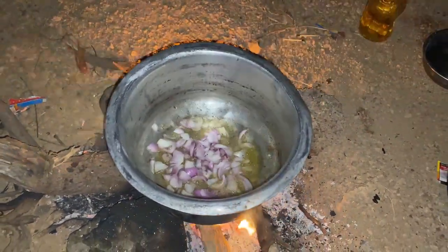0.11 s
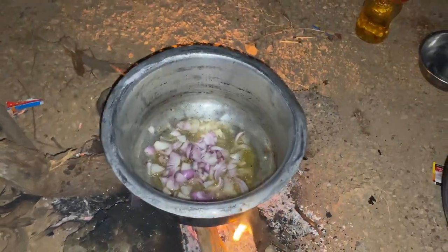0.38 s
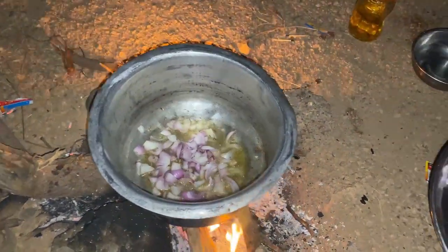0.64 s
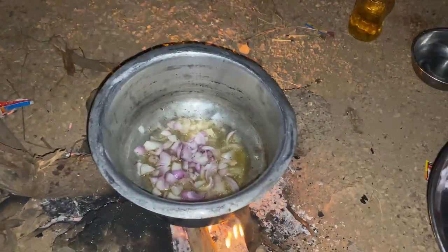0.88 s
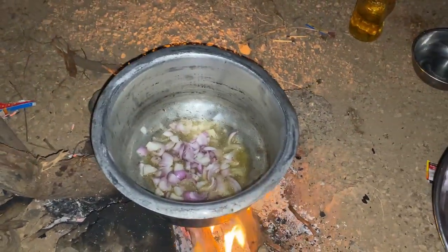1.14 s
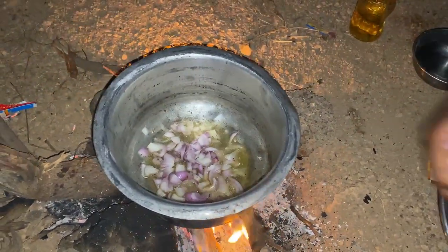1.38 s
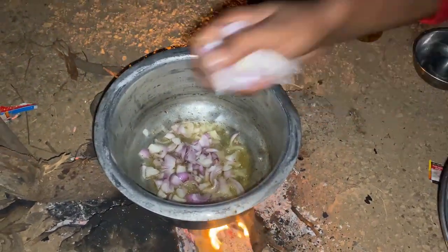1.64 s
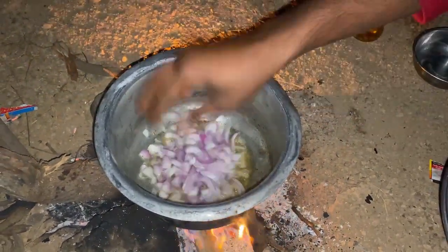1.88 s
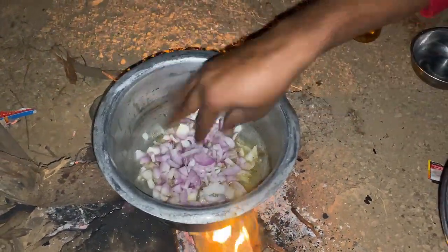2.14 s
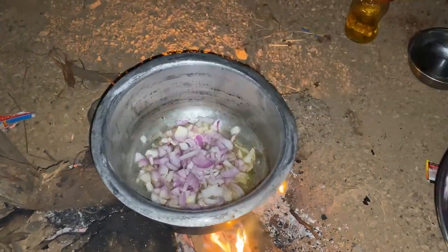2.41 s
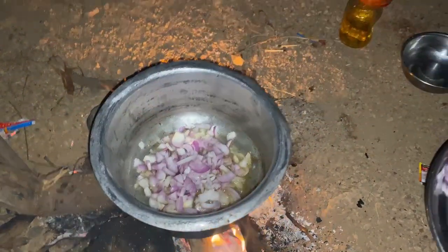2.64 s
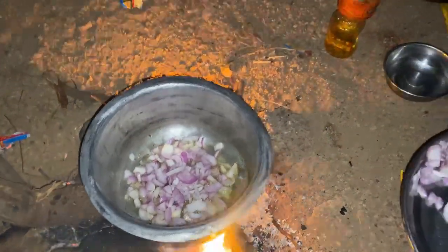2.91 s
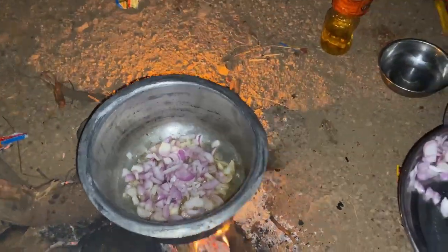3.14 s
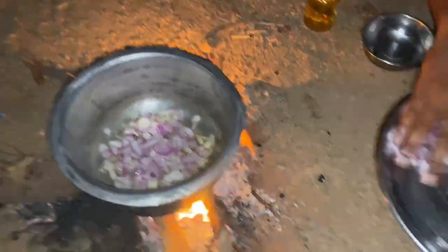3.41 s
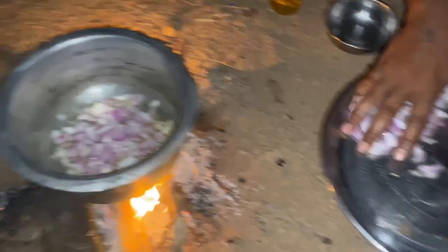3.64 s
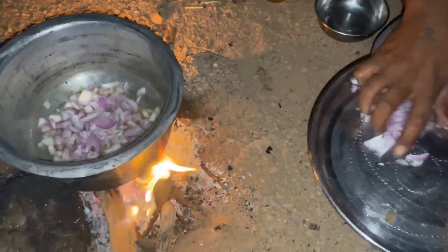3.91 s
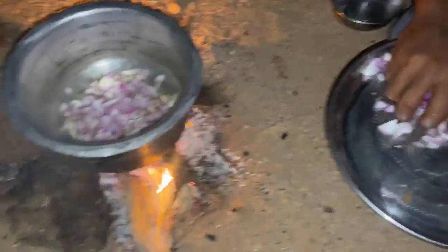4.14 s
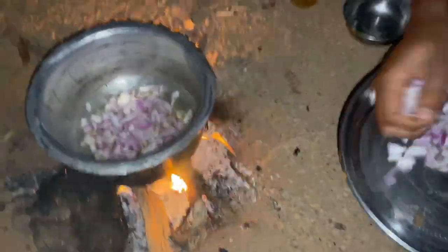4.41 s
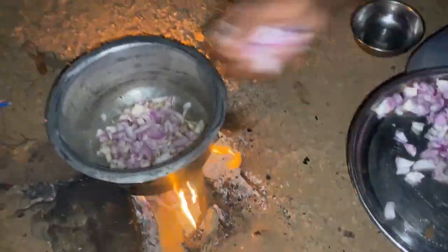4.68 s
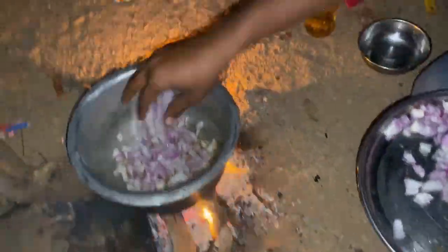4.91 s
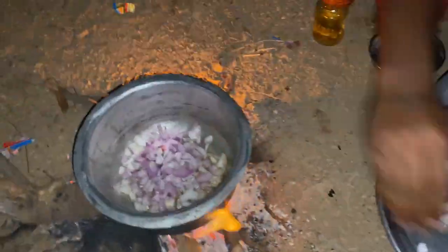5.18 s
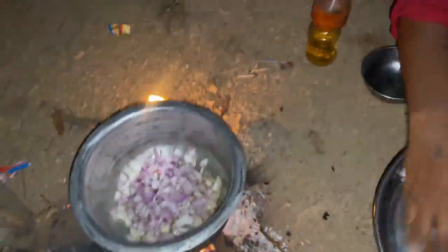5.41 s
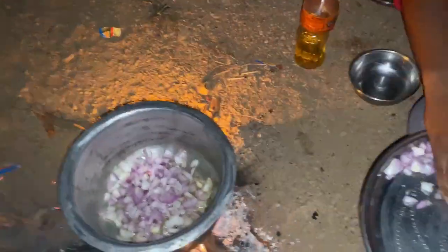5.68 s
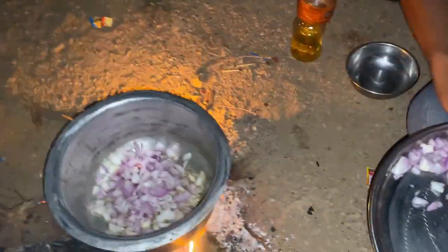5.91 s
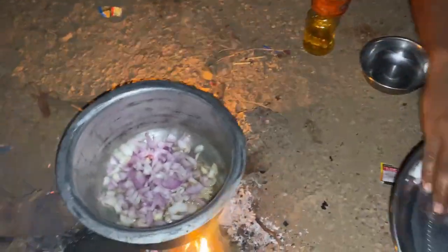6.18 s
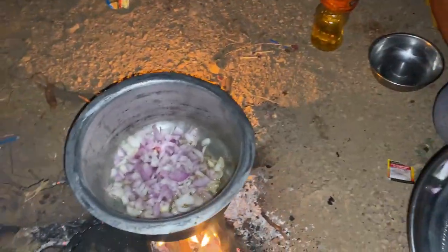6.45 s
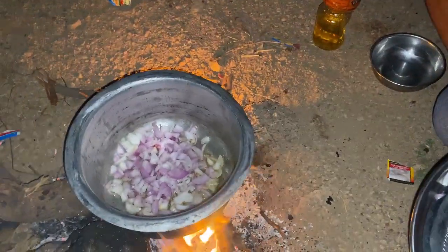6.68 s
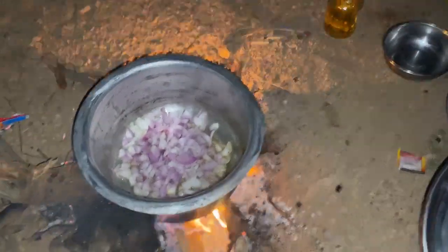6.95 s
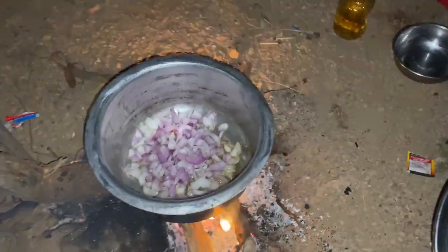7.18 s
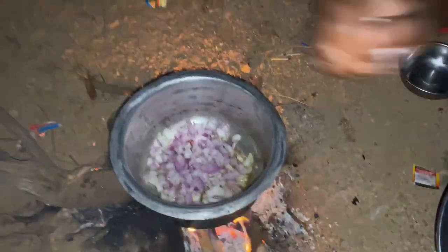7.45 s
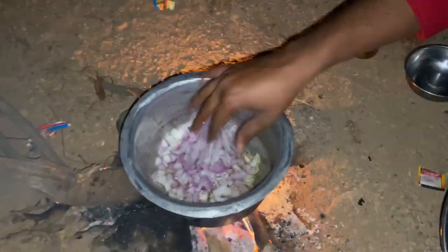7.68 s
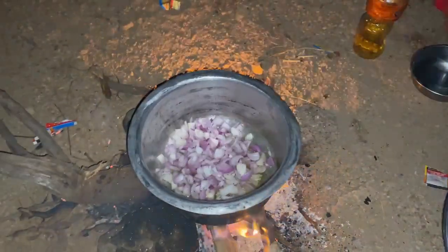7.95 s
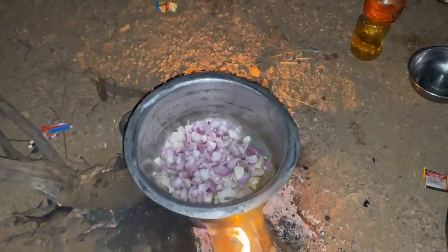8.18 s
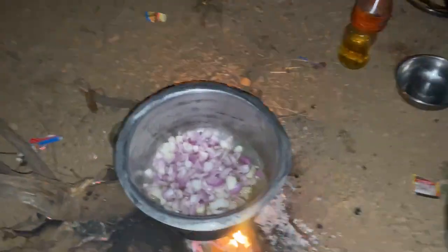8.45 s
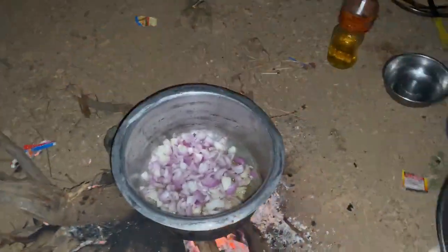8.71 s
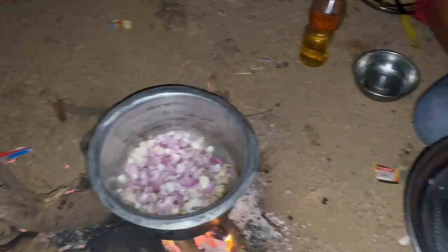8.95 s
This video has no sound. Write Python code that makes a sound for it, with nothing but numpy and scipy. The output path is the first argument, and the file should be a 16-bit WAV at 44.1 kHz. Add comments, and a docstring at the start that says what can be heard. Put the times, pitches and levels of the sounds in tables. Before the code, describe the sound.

A dense, bright sizzle of onions frying in oil fills an open metal pot, full of pops and sharp spits. Handfuls of onion land with soft hollow thuds near two, five and eight seconds. Between them, fingers tap and rake a tray dully. Flames flutter and puff quietly in the bass. Close hand-held stereo, outdoors, dry.

```python
"""Chopped onions fry in oil in an open metal pot over a wood fire outdoors, heard on a hand-held microphone pair.
Bursting steam bubbles are thousands of random clicks sent through resonances: a dense fizz with pops. Louder
spits and short pitched rings are dying tones; the fizz and the cracks of the spits also ring the air in the pot.
Clumps of onion land as soft hollow thuds, fingers knock and rake a tray with damped taps and dull bumps, and the
flames flutter and puff in the bass as shaped noise and single low pushes. A low hum of narrow noise comes and goes."""
import sys
import numpy as np
from scipy import signal
from scipy.fft import rfft, irfft
from scipy.io import wavfile
from scipy.ndimage import uniform_filter1d

SR = 44100
rng = np.random.default_rng(int(sys.argv[2]) if len(sys.argv) > 2 else 0)


def linear_from_db(decibels):
    """Turn decibels (scalar or array-like) into linear amplitude factors; 0 gives 1."""
    return 10 ** (np.asarray(decibels, float) / 20)


def file_out(sig):
    """Save sig as 16-bit WAV at sys.argv[1]."""
    # one column per channel
    cols = np.atleast_2d(sig).T
    # limit, then scale
    lim = np.clip(cols, -1, 1)
    pcm = np.round(lim * 32767).astype(np.int16)
    wavfile.write(sys.argv[1], SR, pcm)


N = 400257   # length in samples
TIME_S = np.arange(N) / SR
HZ = np.maximum(np.fft.rfftfreq(N, 1 / SR), 1)

# Levels in the tables set each source before the microphone pair shapes it.
# vigour of the frying: (t/s, fine bubbles' level/dB, large bubbles against fine ones/dB)
FRYING = [(0.0, -27.5, -5), (0.15, -28, -3.5), (0.88, -29.5, -2.5), (1.29, -30, -5), (1.82, -31.5, -3),
          (2.07, -28.5, -4.5), (2.48, -29.5, -3), (3.59, -32, -7), (4.45, -33.5, -8), (4.83, -36.5, -5),
          (5.33, -30.5, -9), (6.83, -35.5, -5.5), (7.02, -32, -8.5), (7.53, -36, -5.5), (8.14, -31.5, -4.5),
          (9.08, -36, -5)]
# balance of the fizz by pitch: (f/Hz, level/dB)
FIZZ_COLOUR = [(250, -26), (900, -37), (1700, -32.5), (2700, -15.5), (4300, -6.5), (5300, -1), (6500, -1),
               (11000, 6.5), (13500, 4.5), (15800, 0.5)]
# resonances, first of the air in the pot, then of the metal wall:
# (f/Hz, width/Hz, level in the fizz/dB, level in a landing/dB)
POT_RESONANCES = [(531, 164, -14.5, -1), (1198, 55, -6, -5.5), (1860, 66, -10.5, -8.5),
                  (2487, 26, -10.5, -6.5), (1071, 4.4, -63, -23.5), (1405, 2.7, -62, -22.5)]
# the pair swings away from the pot towards the tray: (start t/s, length/s, amount/dB, 0 dB = one full turn)
TURNS_AWAY = [(3.7, 0.56, 1.5), (4.4, 0.35, 0)]
TURN_DB_PER_S = 109
# what one full turn does to the frying: (f/Hz, level change/dB)
TURN_COLOUR = [(1500, 0.5), (2000, -3), (2800, 0), (3600, -6.5), (5400, 3), (7500, -1.5), (11000, -2.5)]
# balance of the flames' flutter: (f/Hz, level/dB)
FLUTTER_COLOUR = [(22, -49), (48, 5.5), (76, 6), (140, -2), (283, -18), (400, -37.5), (550, -28),
                  (920, -120)]
# gusts in the flames: (middle t/s, half length/s, level/dB)
FLAME_GUSTS = [(1.772, 0.12, -31.5), (1.91, 0.061, -28), (2.083, 0.052, -33.5), (2.35, .03, -43),
               (2.804, 0.081, -38), (2.963, 0.034, -29.5), (3.745, 0.072, -24), (3.925, 0.047, -37),
               (4.36, 0.14, -40.5), (4.773, 0.024, -32), (8.46, 0.043, -33.5)]
# balance of the open air, without its outer ends: (f/Hz, level/dB)
AIR_COLOUR = [(130, 3.5), (290, -5), (380, -17), (650, -12), (950, -22.5), (2500, -44)]
# loud spits: (t/s, ring level/dB, ring f/Hz, crack strength against the ring/dB)
LOUD_SPITS = [(0.0884, -6, 6650, -23), (0.118, -9.5, 5300, -8), (0.161, -18, 3300, 0.5),
              (0.308, -8, 7500, -30), (0.41, -4, 11700, -34), (0.6407, -14, 2880, -13),
              (0.658, -4, 7350, -31), (0.7345, -7, 6500.0, -35), (0.8422, -9.5, 3260, -4.5),
              (0.922, -4, 3200, -22), (0.984, -5, 11000, -15), (1.084, -10.5, 10420.0, -7),
              (1.162, -10.5, 10380.0, -8), (1.4351, -9, 2920, -30), (1.473, -12.5, 4100, -22),
              (1.5264, -3, 7100, -20), (1.6683, -13, 1970, -23), (1.692, -17, 4200, -20),
              (1.755, -9, 5200, -32), (1.7945, -13.5, 3000, -15), (1.945, -6.5, 6500, -11.5),
              (2.4063, -6, 6130, -30), (2.8644, -14, 3800, -9), (3.019, -2, 8500, -29),
              (3.052, -4.5, 10000, -24), (3.0542, -12, 2940, -9), (3.1433, -14.5, 3100, -5),
              (3.456, -8, 6500, -15), (3.4995, -15, 2980, -10), (3.838, -4.5, 9600, -40),
              (3.8664, -13.5, 3930, -21), (4.0078, -5.5, 6500, -25), (4.052, -13, 5200, -13),
              (4.1588, -7, 7900, -40), (4.358, -2.5, 6000, -20), (4.422, -11, 6060, -32),
              (4.6835, -12.5, 5800, -24), (4.7231, -4, 5960, -27), (4.751, -2, 10700, -41.5),
              (5.811, -8, 10300, -22), (5.929, -9, 6500, -25), (6.024, -11, 5530, -20),
              (6.1556, -19, 2800, -17), (6.572, -5.5, 9100, -16), (6.621, -9, 11900, -22),
              (6.9173, -8, 12100, -16), (6.9242, -16, 3400, -5), (7.287, -5.5, 9100, -9),
              (7.3258, -15, 4230, -29.0), (7.577, -19.5, 3140, -4), (7.685, -14.5, 3960.0, -31),
              (7.9543, -11, 3160, -32), (8.0205, -11, 4870, -13), (8.1053, -13, 12100.0, -4),
              (8.1406, -10, 12300, -17), (8.1426, -7.5, 3300, -8.5), (8.4042, -14, 11200, -7),
              (8.472, -10, 8550, -13.5), (8.7005, -20.5, 2600, 1), (8.804, -12.5, 7000, -11)]
# short pitched rings: bursting bubbles, and at 7.2885 s the air in the pot ringing after a loud spit:
# (t/s, level/dB, starting f/Hz, ring time/s)
SHORT_RINGS = [(0.1585, -24.5, 2480, .008), (0.186, -18, 3870, 0.0043), (.4339, -14, 4180, 0.0012),
               (.4544, -20, 3840, 0.003), (.4763, -13, 4220, 0.0013), (.6125, -18, 4200, 0.0016),
               (0.8266, -9.5, 1870, 0.00079), (.8405, -19.5, 2460, 0.012), (1.1715, -16, 4270, .002),
               (4.5086, -12.5, 5200, 0.00077), (7.2876, -16, 3220, 0.0017), (7.2885, -21.5, 1180, 0.0046),
               (7.2885, -27.5, 570, 0.0034), (7.778, -19, 4700, 0.0013), (8.31, -15.5, 4000, 0.0011),]
# single puffs of flame: (t/s, level/dB, f/Hz)
FLAME_PUFFS = [(0.928, -20.5, 106), (3.772, -16, 81.5), (6.476, -24.5, 83.5), (6.714, -26, 69),
               (7.03, -33, 83.4), (7.439, -24, 77), (8.109, -31, 53.8), (8.478, -23, 84.5),
               (8.512, -20, 95), (8.577, -21.5, 174), (8.596, -19.5, 66.5)]
# dull knocks on the tray: (t/s, level/dB, lowest f/Hz)
TRAY_KNOCKS = [(1.398, -27.5, 670), (3.681, -32, 620), (3.774, -29.5, 290), (3.936, -33, 680),
               (4.162, -36, 346), (4.299, -32, 694), (4.357, -31, 680), (4.389, -30, 427),
               (4.475, -40, 620), (4.631, -25.5, 1170), (5.326, -35.5, 363), (5.474, -29.5, 610),
               (5.573, -23, 730), (5.835, -23.5, 665)]
# clumps of onion landing: (t/s, level/dB, f/Hz of the hollow note)
ONION_DROPS = [(1.834, -26.5, 480), (1.844, -22.5, 525), (4.909, -40, 507), (4.936, -27, 545),
               (4.95, -24.5, 533), (7.705, -29.5, 545)]
# fingers raking onion on the tray: (start t/s, length/s, level/dB)
TRAY_RAKES = [(3.86, 0.13, -48), (4.2, 0.18, -55), (5.4, 0.13, -54.5)]
# a low hum that comes and goes: (start t/s, length/s, level/dB)
HUM_TIMES = [(4.4, 0.9, -46), (6.2, 0.45, -48)]
# how alike the two microphones hear a sound: (f/Hz, likeness 0-1)
PAIR_LIKENESS = [(80, 0.86), (300, 0.56), (1150, 0.72), (2000, 0.086), (2600, 0.62), (4000, 0.43),
                 (4700, 0.03), (5900, 0.11), (6600, 1), (16000, 1)]
# how much louder the left microphone is than the right: (f/Hz, level/dB)
LEFT_LEAN = [(90, 0.5), (250, 3), (550, 7), (1000, 1.5), (1800, 6.5), (2600, 3), (4000, 2), (5000, 3),
             (8500, 0)]
# how far the right microphone leads, used up to 6000 Hz: (f/Hz, lead/radians)
RIGHT_LEAD = [(100, 0.25), (900, 0.53), (1400, -1.76), (2000, 0.088), (2400, -0.5), (3000, 0.088),
              (6000, 1)]


def rms_one(x):
    """Scale a sound to an average strength (rms) of 1."""
    return x / np.sqrt(np.mean(x ** 2) + 1e-20)


def in_time(rows):
    """Join the points of a table by straight lines: one value a sample for each column."""
    s, *columns = np.transpose(rows)
    return [np.interp(TIME_S, s, column) for column in columns]


def at_hz(points, hz):
    """Read a (f/Hz, value) table, with pitch spaced as the ear hears it, by ratios."""
    table_hz, values = np.transpose(points)
    return np.interp(np.log(hz), np.log(table_hz), values)


def colour(x, spectrum):
    """Raise or lower each frequency by a table in dB."""
    return irfft(rfft(x) * linear_from_db(at_hz(spectrum, HZ)), N)


def drift(rate_hz):
    """Wander slowly at random around 0 with spread 1; a higher rate wanders faster."""
    step = 40   # samples between the computed points
    r = np.exp(-2 * np.pi * step * rate_hz / SR)
    noise = rng.standard_normal(N // step + 2002)
    slow = signal.lfilter([1], [1, -2 * r, r * r], noise)[2000:]   # drop the filter's start
    return np.interp(np.arange(N) / step, np.arange(len(slow)), rms_one(slow))


def resonate(x, hz, width_hz):
    """Ring at one pitch, peaking near 1 for a unit click; a wider resonance dies sooner."""
    r, w = np.exp(-np.pi * width_hz / SR), 2 * np.pi * hz / SR
    return signal.lfilter([0, np.sin(w)], [1, -2 * r * np.cos(w), r * r], x + 1e-18)


def keep_range(x, order, edge_hz, kind):
    """Let only the highs ("high") or a range ("band") through."""
    return signal.sosfilt(signal.butter(order, edge_hz, kind, fs=SR, output="sos"), x)


def place(track, s, wave):
    """Add a short wave to a track at a moment."""
    i = round(s * SR)
    track[..., i:i + wave.shape[-1]] += wave


def twin(clicks):
    """Pair a click train with a copy of random signs: same moments, unrelated waves."""
    return np.array([clicks, clicks * rng.choice([-1, 1], N)])


def swells(rows, rise_db_per_s, fall_db_per_s):
    """Gain of events that rise, hold for their length and fall; the loudest one counts."""
    gains = []
    for s, length, db in rows:
        early, late = np.maximum(s - TIME_S, 0), np.maximum(TIME_S - s - length, 0)
        gains.append(linear_from_db(db - rise_db_per_s * early - fall_db_per_s * late))
    return np.max(gains, axis=0)


def fizz(per_s=2200, spread_db=3.5, hiss_db=-13.5, cycles=3.05, clump_db=3.0, patchy_db=2.0,
         snap_db=-9.5, quick=1.33):
    """Random bursts ring at 14 bubble pitches over a bed of hiss, and ring the air in the pot."""
    fine_db, coarse_db = in_time(FRYING)
    large_db = fine_db + coarse_db
    middle_db = fine_db - 0.5 + 0.59 * coarse_db   # follows part of the large bubbles' change
    away = swells(TURNS_AWAY, TURN_DB_PER_S, TURN_DB_PER_S)
    sizes = linear_from_db(spread_db * np.minimum(rng.exponential(1, N), 4.2)) * rng.choice([-1, 1], N)
    clumping = drift(25) + 0.3 * drift(6)
    born = rng.random(N) < per_s * linear_from_db(clump_db * clumping) / SR
    bursts = twin(rms_one(sizes * born))
    dealt = rng.integers(0, 17, N)   # 14 deals go to one pitch each, the other 3 snap in all at once
    out = 0
    for k, hz in enumerate(np.geomspace(1200, 15000, 14)):
        large, middle, fine = (np.interp(hz, [3600, 5300, 7500], share) for share in np.eye(3))
        level_db = large * large_db + middle * middle_db + fine * fine_db
        level_db = level_db + patchy_db * drift(10.0) + away * at_hz(TURN_COLOUR, hz)
        clicks = bursts * ((dealt == k) + linear_from_db(snap_db) * (dealt > 13))
        hiss = linear_from_db(hiss_db) * rng.standard_normal((2, N))
        push = (clicks + hiss) * linear_from_db(level_db)
        # two resonances in a row: the ring swells quickly, then dies
        first_ring = resonate(push, hz, quick * hz / cycles)
        out = out + resonate(first_ring, hz, hz / cycles) * quick / cycles
    body = 0
    for hz, width_hz, db, _ in POT_RESONANCES:
        body = body + linear_from_db(db + 2.6 * drift(2.7)) * rms_one(resonate(bursts, hz, width_hz))
    return linear_from_db(0.5) * colour(out, FIZZ_COLOUR) + linear_from_db(large_db - 11.0 - 3.6 * away) * body


def pops(per_s=70.0, spread_db=4.5, cycles=2.67, level_db=9.0, large_db=-6.5, clump_db=3.0,
         low_hz=3200, high_hz=13000):
    """Water pops in hot oil in clusters, at one of 8 pitches; few cycles snap dry, many sound wet."""
    fine_db, coarse_db = in_time(FRYING)
    away = swells(TURNS_AWAY, TURN_DB_PER_S, TURN_DB_PER_S)
    born = rng.random(N) < per_s * linear_from_db(clump_db * drift(8)) / SR
    spread = spread_db * np.minimum(rng.exponential(1, N), 2.2)
    sizes = linear_from_db(level_db + fine_db + spread) * born
    dealt, bursts = rng.integers(0, 8, N), 0
    for k, hz in enumerate(np.geomspace(low_hz, high_hz, 8)):
        low_share = np.interp(hz, [3600, 7500], [1, 0])
        low_db = low_share * (large_db + coarse_db - coarse_db.mean())
        push = sizes * (dealt == k) * linear_from_db(low_db + away * at_hz(TURN_COLOUR, hz))
        bursts = bursts + resonate(push, hz, hz / cycles)
    return np.array([keep_range(bursts, 3, 0.86 * low_hz, "high"), np.zeros(N)])


def flames(calm_db=-44.5, lumpy_db=7.0, air_db=-46.5):
    """Flapping flames are lumpy low noise that swells in gusts, over the steady noise of open air."""
    flutter = rms_one(colour(rng.standard_normal((2, N)), FLUTTER_COLOUR))
    # level out the noise's own swells, so that the gusts and lumps set the loudness
    even = flutter / np.sqrt(uniform_filter1d(flutter ** 2, size=3001) + 0.11)
    flapping = linear_from_db(calm_db)
    for s, half_s, db in FLAME_GUSTS:
        flapping = flapping + linear_from_db(db) * np.exp(-((TIME_S - s) / half_s) ** 2)
    lumps = linear_from_db(lumpy_db * np.clip(drift(20.8), -3, 1.4))
    air_colour = [(60, -21)] + AIR_COLOUR + [(6000, -72)]
    air = rms_one(colour(rng.standard_normal((2, N)), air_colour))
    return flapping * lumps * even + linear_from_db(air_db) * air


def spits(cycles=4.0, swell_s=0.0003, pot_db=-39.0, edge_db=13.0, spray_db=-12.5, spray_s=0.003,
          damped=0.9, deep=0.84):
    """A spit is a short swelling ring, a sharp crack and a dying spray; crack and spray nudge the pot."""
    rings, cracks, t = np.zeros((2, N)), np.zeros((2, N)), np.arange(400) / SR
    late = np.maximum(t - swell_s, 0)
    quarter_turn = np.array([[0], [np.pi / 2]])   # makes the second wave unlike the first
    for s, db, hz, crack_db in LOUD_SPITS:
        shape = np.minimum(t / swell_s, 1) ** 2 * np.exp(-np.pi * hz / cycles * late)
        place(rings, s, linear_from_db(db) * shape * np.sin(2 * np.pi * hz * t + quarter_turn))
        edge = linear_from_db(db + crack_db + edge_db)
        droplets = rng.standard_normal((2, 400)) * (late > 0) * np.exp(-late / spray_s)
        place(cracks, s, edge * linear_from_db(spray_db) * droplets)
        cracks[0, round(s * SR) + round(swell_s * SR)] += edge
    pot = 0
    for hz, width_hz, db, landing_db in POT_RESONANCES:
        # "deep" mixes the pot's balance in the fizz (0) with that in a landing (1)
        level_db = pot_db + db - POT_RESONANCES[1][2] + deep * (landing_db - db)
        pot = pot + linear_from_db(level_db) * resonate(cracks, hz, damped * width_hz)
    return rings + keep_range(cracks, 2, 1500, "high") + pot


def short_rings(rise_s=0.00037, climb=0.01):
    """A bursting bubble, or the pot's air after a spit, rings as one tone that climbs a little and dies."""
    out, t = np.zeros((2, N)), np.arange(1800) / SR
    quarter_turn = np.array([[0], [np.pi / 2]])
    for s, db, hz, ring_s in SHORT_RINGS:
        turns = hz * t * (1 + climb * t / ring_s)
        shape = (1 - np.exp(-t / rise_s)) * np.exp(-t / ring_s)
        place(out, s, linear_from_db(db) * shape * np.sin(2 * np.pi * turns + quarter_turn))
    return out


def puffs(puff_cycles=0.95):
    """A puff of flame is one low push and its rebound, soon dying."""
    out, t = np.zeros((2, N)), np.arange(4000) / SR
    for s, db, hz in FLAME_PUFFS:
        turns = hz * t
        age = 2 * turns / puff_cycles   # strongest at 1
        place(out[0], s, linear_from_db(db) * np.sin(2 * np.pi * turns) * age * np.exp(1 - age))
    return out


def knocks(upper_db=-7.5):
    """A damped tap on the tray sounds three tones that die within a few cycles."""
    out, t = np.zeros((2, N)), np.arange(900) / SR
    for s, db, hz in TRAY_KNOCKS:
        soft_contact = 1 - np.exp(-t / 0.0015)
        fade = np.exp(-np.pi * hz / 4.5 * t) * soft_contact * 2
        lowest = np.sin(2 * np.pi * hz * t)
        upper = np.sin(2 * np.pi * 1.215 * hz * t) + np.sin(2 * np.pi * 2 * hz * t)
        place(out[0], s, linear_from_db(db) * fade * (lowest + linear_from_db(upper_db) * upper))
    return out


def drops(swell_s=0.004, patter_db=-13.0, patter_s=0.006):
    """A soft clump swells the pot's hollow note; loose pieces patter after it and ring air and wall."""
    thud, patter, t = np.zeros((2, N)), np.zeros((2, N)), np.arange(2000) / SR
    for s, db, hz in ONION_DROPS:
        shape = t / swell_s * np.exp(1 - t / swell_s)
        place(thud[0], s, linear_from_db(db) * shape * np.sin(2 * np.pi * hz * t))
        delay_chance, push_chance = rng.random((2, 12))   # twelve loose pieces
        landing_s = s - patter_s * np.log(delay_chance + 1e-3)
        patter[0, (landing_s * SR).astype(int)] = linear_from_db(db + patter_db) * (2 * push_chance - 1)
    patter = keep_range(patter, 2, [380, 1600], "band") * 4   # soft contact
    ringing = sum(linear_from_db(db) * resonate(patter, hz, width_hz) for hz, width_hz, _, db in POT_RESONANCES)
    return thud + ringing


def raking(per_s=600, low_hz=400, high_hz=2300, tray_hz=650, tray_db=-22.0):
    """Fingers raking onion make soft dense bumps in the dull range of the tray."""
    bumps = twin((rng.random(N) < per_s / SR) * rng.standard_normal(N))
    dull = keep_range(bumps, 2, [low_hz, high_hz], "band")
    tray = linear_from_db(tray_db) * resonate(bumps, tray_hz, 130)
    return swells(TRAY_RAKES, rise_db_per_s=134, fall_db_per_s=89) * rms_one(dull + tray)


def hum(hz=138, width_hz=3.4, fade_db_per_s=46):
    """Noise through one narrow resonance hums at nearly one pitch."""
    tone = rms_one(resonate(rng.standard_normal((2, N)), hz, width_hz))
    return swells(HUM_TIMES, fade_db_per_s, fade_db_per_s) * tone


def microphone_pair(pair, in_step_hz=6950, turn_hz=4220):
    """Mix a wave and its companion into left and right, with likeness, lean and lead by frequency."""
    same, other = rfft(pair)
    alike = np.clip(at_hz(PAIR_LIKENESS, HZ), 0, 1)
    # treble: in step at the first setting, then the left lags one more cycle every turn_hz
    treble_lead = 2 * np.pi * (HZ - in_step_hz) / turn_hz
    lead = np.where(HZ > 6000, treble_lead, at_hz(RIGHT_LEAD, HZ))
    lean = linear_from_db(at_hz(LEFT_LEAN, HZ) / 2)   # half the difference for each side
    shared, apart = np.sqrt(1 + alike) * same, np.sqrt(1 - alike) * other
    left = (shared + apart) * lean
    right = (shared - apart) / lean * np.exp(1j * lead)
    return irfft(np.array([left, right]), N) / np.sqrt(2)


def scene():
    """Add up all sources and hear them through the microphone pair."""
    dry_pops = pops()
    wet_pops = pops(per_s=80.0, cycles=8.0, level_db=3.5, large_db=-5.5, low_hz=2500, high_hz=7500)
    frying = fizz() + dry_pops + wet_pops + spits() + short_rings()
    fire = flames() + puffs()
    handling = knocks() + drops() + raking()
    return microphone_pair(frying + fire + handling + hum())


def roll_off(x):
    """The treble ends steeply here."""
    return signal.sosfilt(signal.butter(12, 17030, fs=SR, output="sos"), x)


def record(dry):
    """A steep filter cuts the very top of the treble."""
    top_cut = signal.cheby2(16, 60, 16050, fs=SR, output="sos")   # 60 dB down from 16050 Hz up
    finished = signal.sosfilt(top_cut, dry)
    return roll_off(finished)


dry = scene()
out = record(dry)
file_out(out)
```